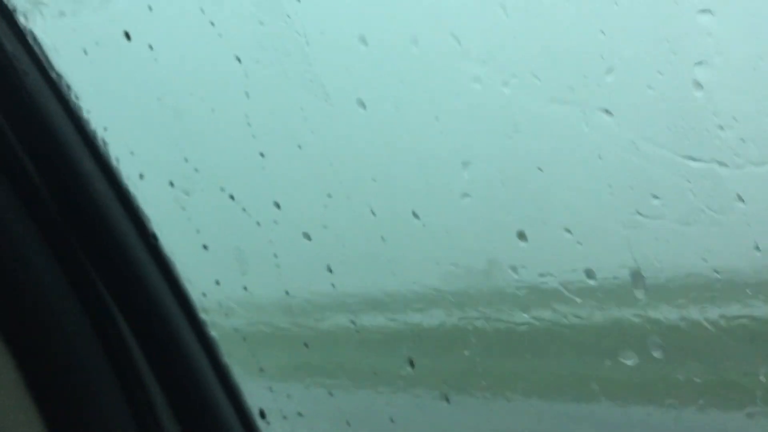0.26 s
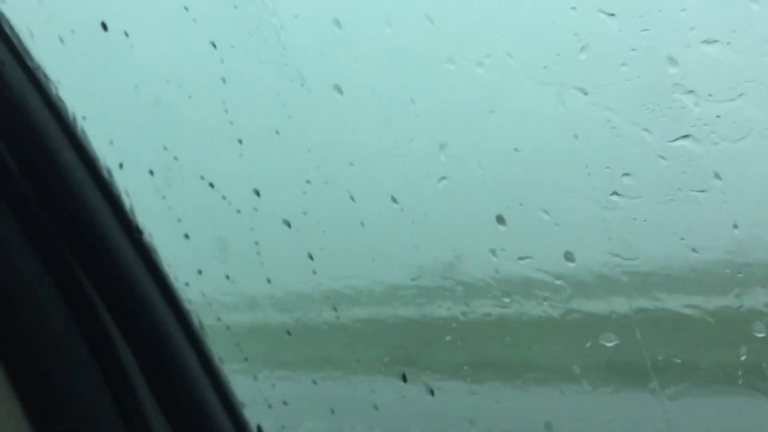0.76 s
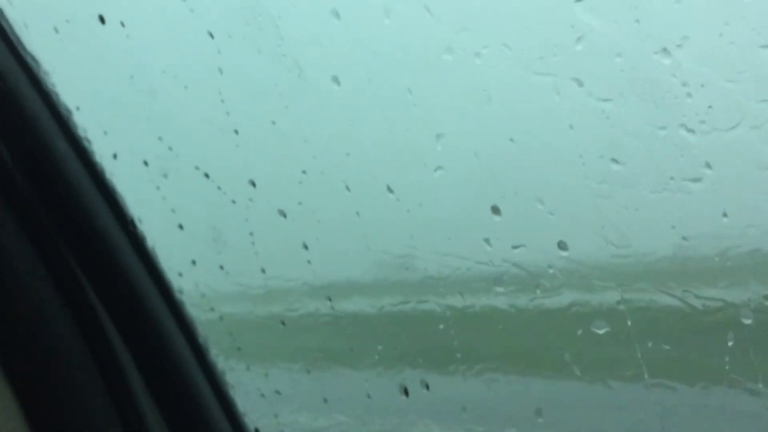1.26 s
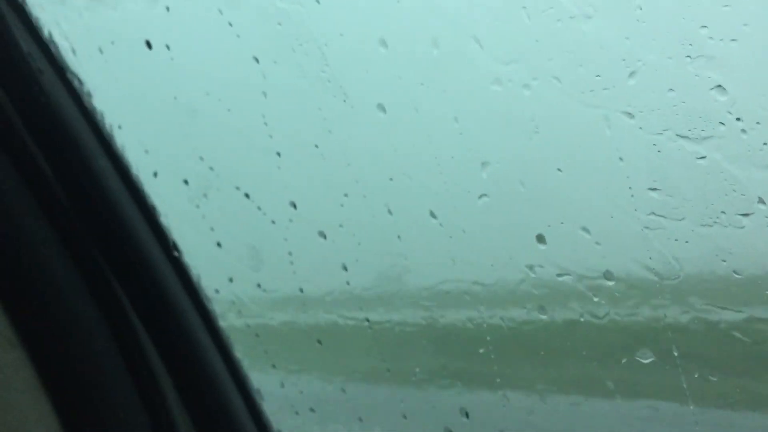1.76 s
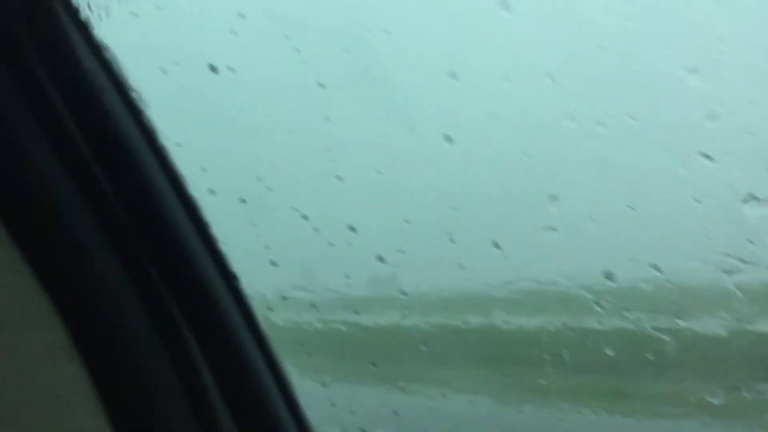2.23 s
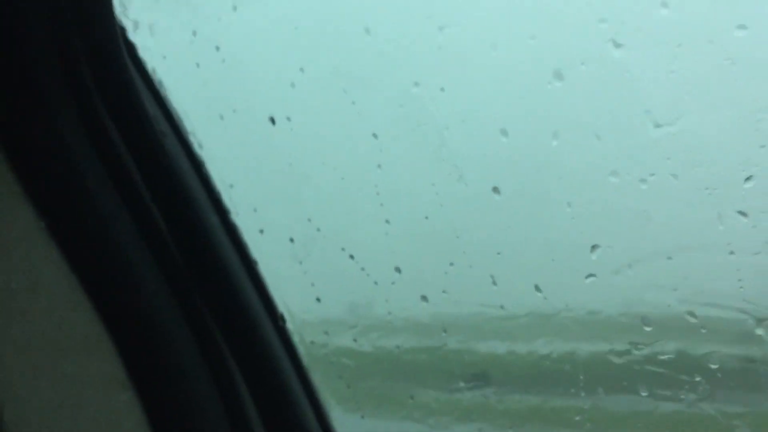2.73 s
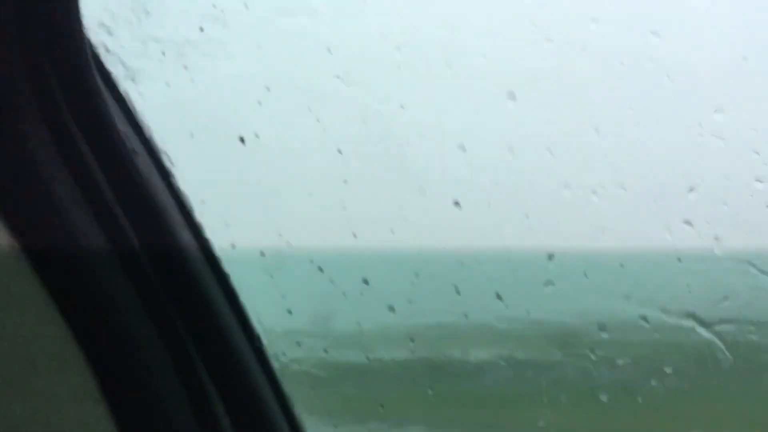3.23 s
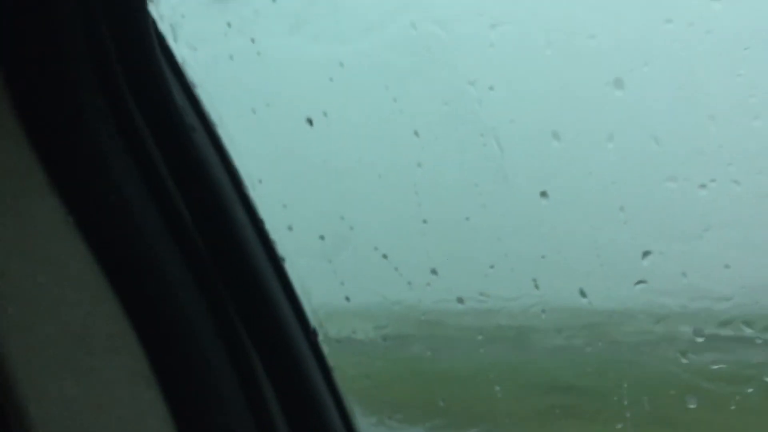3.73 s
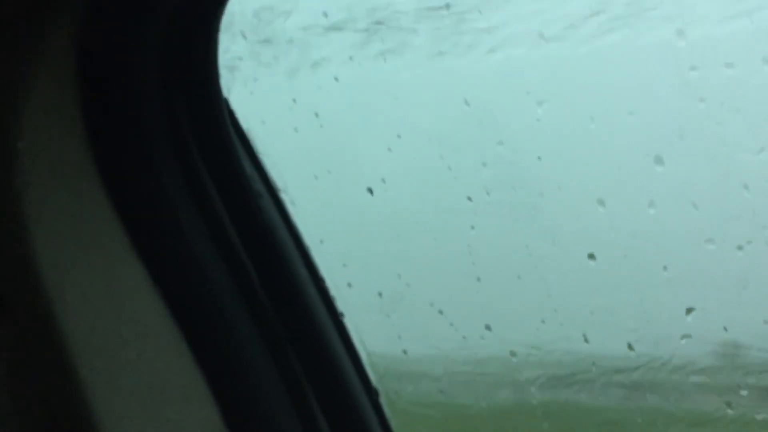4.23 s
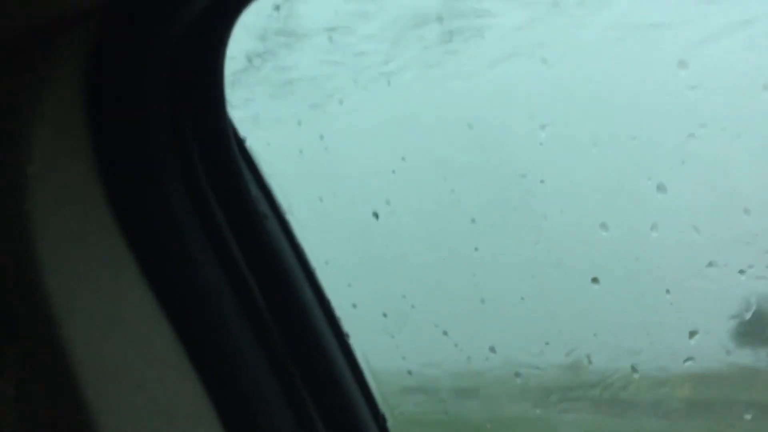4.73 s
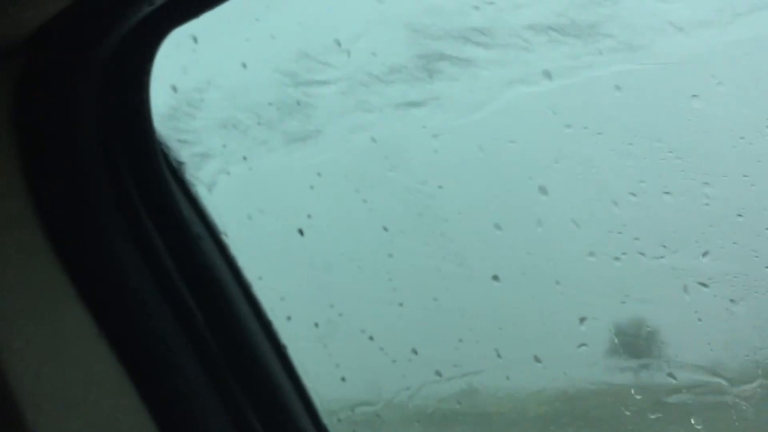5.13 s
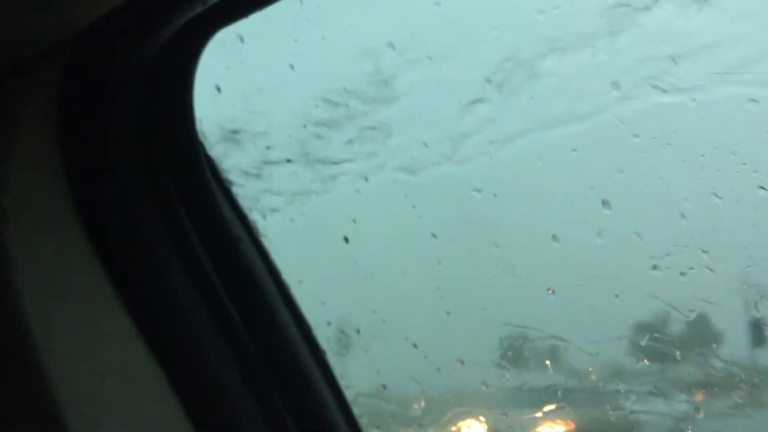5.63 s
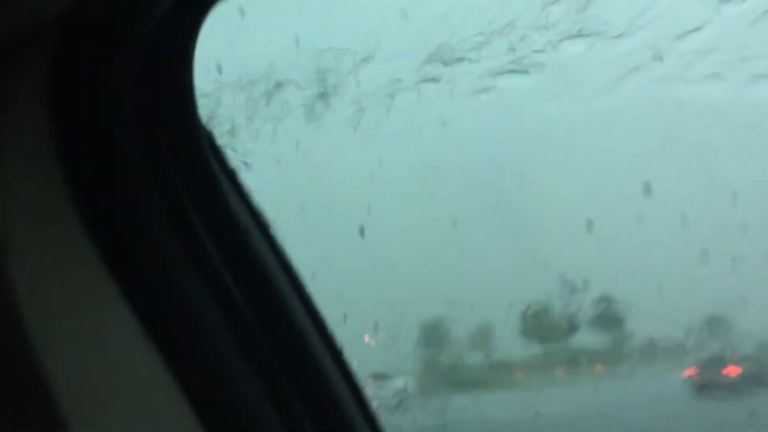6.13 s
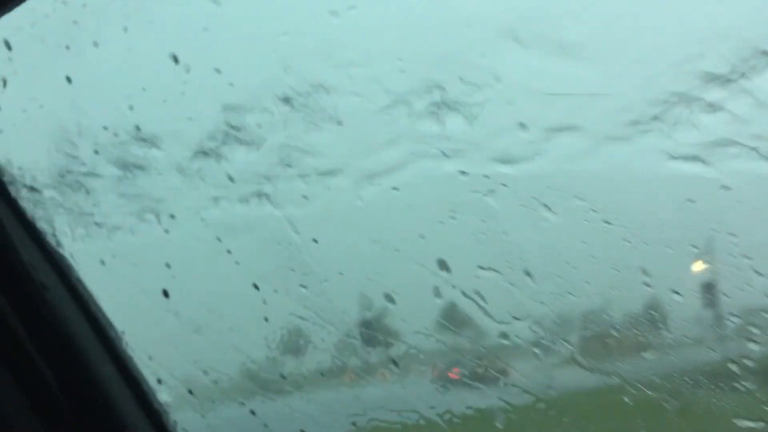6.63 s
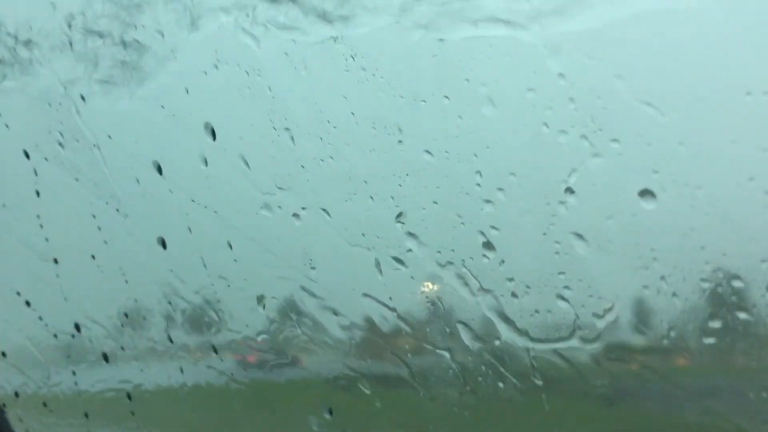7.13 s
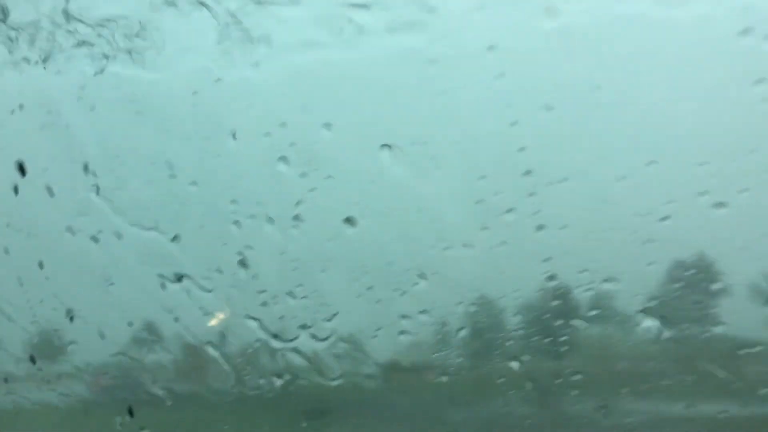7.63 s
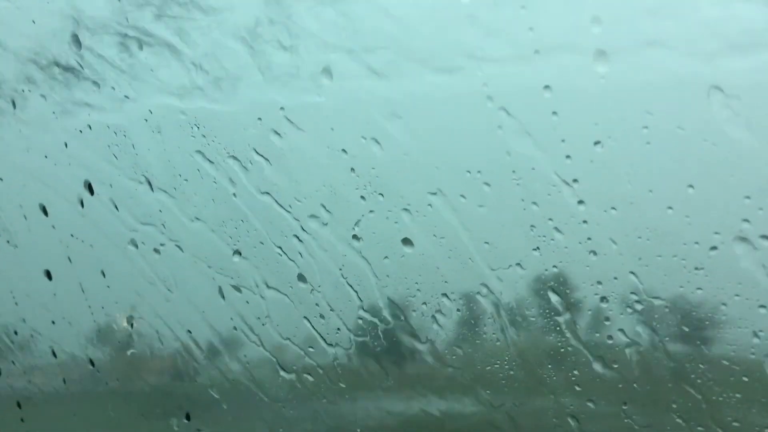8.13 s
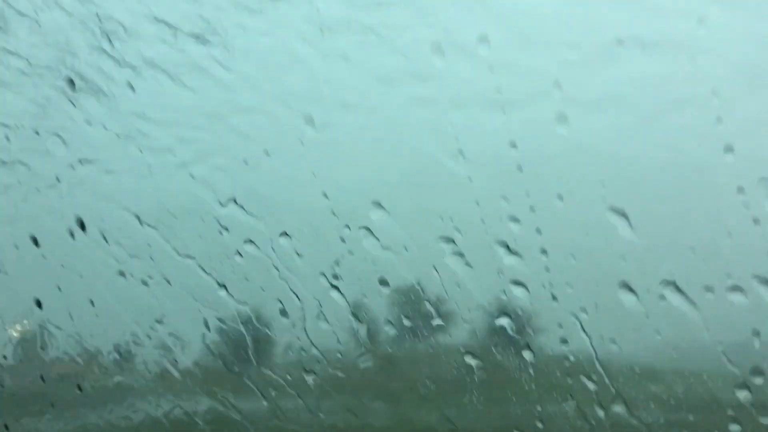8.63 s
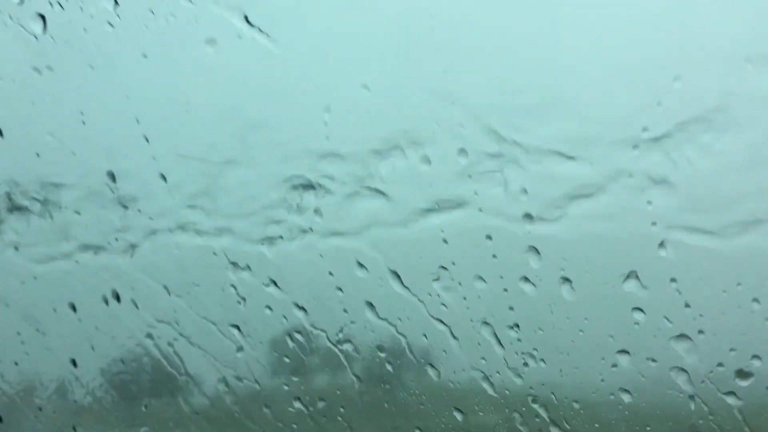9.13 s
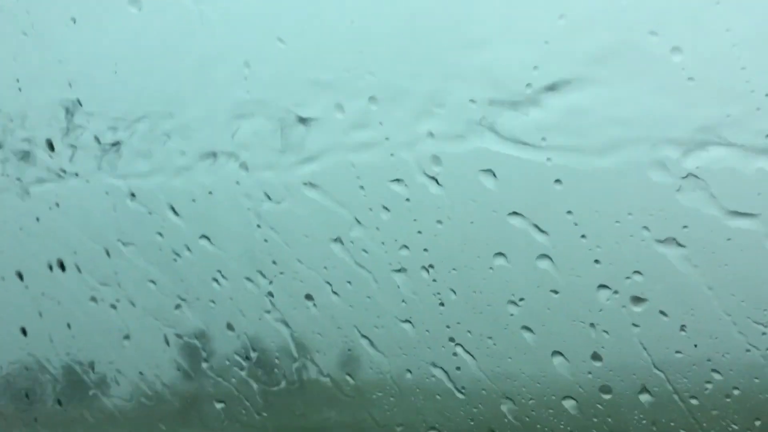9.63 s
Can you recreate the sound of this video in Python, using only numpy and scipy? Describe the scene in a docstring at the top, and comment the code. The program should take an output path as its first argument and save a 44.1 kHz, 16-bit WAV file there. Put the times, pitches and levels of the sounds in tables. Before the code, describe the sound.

Inside a car driving through a downpour, close to the side window. Dense rain patters on glass and drums on the roof in uneven gusts over a low tyre and wind rumble. Soon single fat drops smack the window nearby, then dull thuds and ragged water splats hit the body, and late on a few hollow knocks ring it. Single-channel, close cabin sound with muffled highs.

```python
"""Inside a car driving through a downpour, heard from a seat beside the window.
From the start, sheets of wind-driven rain patter on the glass and drum on the roof, as showers of random
damped drops, over filtered noise for the road and wind rumbling in the cabin's low resonances.
From 2.4 s single fat drops smack the window close by; from 3 s dull sinking thuds come from the body.
From 3.7 s gouts of water slap the body as ragged falling splats, and from 7 s a few hollow knocks ring it."""
import sys
import numpy as np
from scipy import signal
from scipy.fft import rfft, irfft, next_fast_len
from scipy.io import wavfile
from scipy.ndimage import map_coordinates

SR = 44100
rng = np.random.default_rng(int(sys.argv[2]) if len(sys.argv) > 2 else 0)


def generate_wav(sig):
    """Save sig (samples, or channels by samples) to the path in sys.argv[1] as 16-bit PCM at SR."""
    pcm = np.round(np.clip(np.atleast_2d(sig).T, -1, 1) * 32767).astype(np.int16)
    wavfile.write(sys.argv[1], SR, pcm)


N = 435266

# Resonances of the roof panel. Each row: pitch in Hz, width in Hz, gain in dB against the plain sound.
ROOF_RESONANCES = [(544, 72, 0), (1058, 62, -8.5), (1569, 140, 3)]


def rain():
    """Fine dense rain, fewer heavy drops and near ticks; a thicker sheet of rain is both denser and louder."""
    # Colour of rain on the window. Each row: frequency in Hz, relative gain in dB.
    glass_colour = [(500, -37.5), (1400, -9), (2050, -4), (2600, -3), (3400, -2.5), (3950, -7),
                    (4900, -16.5), (5600, -19), (6600, -25), (7700, -34), (9300, -39), (10500, -49),
                    (15000, -56)]
    # Resonances of the window. Each row: pitch in Hz, width in Hz, gain in dB against the plain sound.
    glass_resonances = [(2040, 110, -18.5), (3150, 100, -10.5), (3296, 170, -12)]
    # Colour of rain on the roof. Each row: frequency in Hz, relative gain in dB.
    roof_colour = [(200, -22), (350, 2.5), (470, -4), (660, -0.5), (760, -6), (950, -3), (1400, -3.5),
                   (1830, -16.5), (2600, -9.5), (5000, -32.5), (12000, -94)]
    glass_db, roof_db = -31.5, -32.5  # gains in average rain
    glass_follows, roof_follows = 0.036, 0.085  # dB of harder impact for each dB of thicker rain
    splash_hz, splash_follows = 6540, 0.12  # above this pitch, further dB for each dB of thicker rain

    level_db = rain_level()
    excess_db = level_db - np.mean(level_db)
    thickness = amp(excess_db)
    flurry_db = 0.95 * wobble(rate=24)  # quick chance changes in the rain

    # drops per second, in average rain, times the thickness
    fine = shower(3000 * thickness ** 2, spread_db=2, ring_t60=0.012)
    heavy = shower(240 * thickness, spread_db=1, ring_t60=0.0092)
    notes = pings(1050 * thickness, centre_hz=2207.3, ring_t60=0.055, spread_db=1.5)
    near = amp(-9) * ticks(170 * thickness ** 2, spread_db=2.7, ring_t60=0.018)

    on_glass = fine + amp(-7) * heavy + amp(-5.5) * notes + near
    glass = panel(on_glass, glass_colour, glass_resonances)
    splash_flicker_db = 1.0 * wobble(rate=32)
    glass = brightened(glass, splash_hz, splash_follows * excess_db + splash_flicker_db)

    # the same heavy drops also drum on the sheet metal, which rings longer
    patter = shower(1500 * thickness, spread_db=2.5, ring_t60=0.024)
    on_roof = patter + amp(-5.5) * heavy + amp(-5) * notes + near
    roof = panel(on_roof, roof_colour, ROOF_RESONANCES)

    glass_gain = amp(glass_db + glass_follows * excess_db + flurry_db)
    roof_gain = amp(roof_db + roof_follows * excess_db + flurry_db)
    return glass * glass_gain + roof * roof_gain


def rain_level():
    """The sheets add their power to the even rain; dB per sample, of which only the swings are used."""
    # The even rain between the sheets. Each row: time in seconds, level in dB.
    even_rain = [(0, -34), (2.08, -34), (2.13, -39.5), (2.18, -40.5), (2.5, -35.5), (3.2, -37),
                 (3.3, -39.5), (4.3, -39.5), (4.95, -39.5), (5.5, -34.5), (6.46, -35), (6.55, -43),
                 (6.62, -39), (6.93, -41), (7.12, -39.5), (7.35, -36.5), (8.15, -38.5), (8.62, -40),
                 (9, -38.5), (9.87, -38.5)]
    # Sheets of rain blown against the car. Each row: start in seconds, length in seconds, level in dB.
    blown_sheets = [(0.041, .11, -35), (0.198, .4, -37), (0.631, .27, -35.5), (1.031, .52, -37),
                    (1.66, .14, -37.5), (1.9, .17, -36.5), (2.201, .16, -38), (2.79, .34, -33.5),
                    (3.162, .09, -36.5), (3.349, .06, -37), (3.574, .055, -37.5), (3.691, .08, -32),
                    (3.799, .05, -35.5), (3.913, .11, -34.5), (4.087, .09, -37.5), (4.336, .1, -37),
                    (4.486, .05, -37), (4.605, .11, -32), (4.749, .14, -33.5), (4.971, .1, -30.5),
                    (5.08, .13, -34), (5.289, .43, -34), (5.869, .25, -34), (6.169, .12, -32),
                    (6.37, .09, -33), (6.586, .06, -36.5), (6.634, .08, -31.5), (6.729, .115, -36.5),
                    (6.98, .09, -39.5), (7.15, .17, -37), (7.379, .5, -36), (7.948, .08, -35),
                    (8.221, .07, -35), (8.404, .06, -33), (8.49, .05, -37), (8.65, .11, -35.5),
                    (8.835, .05, -34), (8.909, .27, -33.5), (9.22, .34, -39.5), (9.661, .15, -35)]
    even_db, = curves(even_rain)
    power = amp(even_db) ** 2
    for start, length, db in blown_sheets:
        sheet = amp(db) * spell(start, length, attack_s=0.045, release_s=0.03)
        power = power + sheet ** 2
    return 10 * np.log10(power)


def shower(per_second, spread_db, ring_t60, cabin_t60=0.3, cabin_db=-14):
    """Random drops of unequal size, each a quickly damped noisy ring with the cabin's short answer; rms 1."""
    t = np.arange(SR // 10) / SR
    lands = rng.random(N) < per_second / SR
    sizes = amp(spread_db * np.minimum(rng.standard_normal(N), 2))
    fade = decay(t, ring_t60) + amp(cabin_db) * decay(t, cabin_t60)
    # unrelated rings add in power
    power = np.abs(signal.oaconvolve(lands * sizes ** 2, fade ** 2)[:N])
    return unit(np.sqrt(power) * rng.standard_normal(N))


def pings(per_second, centre_hz, ring_t60, spread_db):
    """Drops that each ring one short note of the panel where they land; rms 1."""
    start = np.flatnonzero(rng.random(N) < per_second / SR)[:, None]
    octaves, weight = rng.standard_normal((len(start), 2)).T[..., None]
    k = np.arange(SR // 50)
    hz = np.minimum(centre_hz * 2 ** octaves, SR / 4)
    sizes = amp(spread_db * np.minimum(weight, 2))
    notes = sizes * decay(k / SR, ring_t60) * np.sin(2 * np.pi * hz * k / SR)
    return unit(np.bincount((start + k).ravel(), notes.ravel(), N)[:N])


def ticks(per_second, spread_db, ring_t60, middle_hz=1999, range_ratio=2.1, click_t60=0.011):
    """Near drops heard one by one: an instant click and a short note, each of its own pitch; rms 1."""
    start = np.flatnonzero(rng.random(N) < per_second / SR)[:, None]
    pitch, weight = rng.uniform(-0.996, 1, (len(start), 2)).T[..., None]
    k = np.arange(SR // 40)
    hz = middle_hz * range_ratio ** pitch
    note = np.sin(2 * np.pi * hz * k / SR) * decay(k / SR, ring_t60)
    click = rng.standard_normal(note.shape) * decay(k / SR, click_t60)
    sounds = amp(spread_db * weight) * (note + click)
    return unit(np.bincount((start + k).ravel(), sounds.ravel(), N)[:N])


def drops(smack_t60=0.022, ring_t60=0.03, spray_t60=0.05, attack_s=0.001, cabin_t60=0.1, cabin_db=-14):
    """Each fat drop smacks the glass, rings one of its notes and bursts into bright spray; the cabin answers."""
    # Fat drops on the window. Each row: start in seconds, level in dB (9 dB is taken off all),
    # ring in Hz, gain of the spray in dB and gain of the note in dB, both beside the smack.
    fat_drops = [(2.3605, -9, 3950, -20, 2), (2.3635, -10.5, 950, -26, 1), (2.5622, -11.5, 2200, -27, 0.5),
                 (3.3135, -22, 3206, -24, 0), (3.592, -17, 3015, -23, 1), (3.651, -20, 3295, -20, -1),
                 (4.019, -22, 3314, -10, -3), (4.2085, -11, 2840, -22, -4), (4.322, -28, 3294, -12, -3),
                 (4.366, -23, 3406, -10, -3), (4.501, -29, 3177, -16, -3), (4.588, -17, 3187, -26, -1),
                 (4.8095, -12, 3307, -22, -6), (4.8245, -14, 3320, -13, -3), (5.0175, -12, 3687, -26, -1),
                 (5.1802, -15, 3454, -19, 0), (5.1965, -11, 3150, -21, -1), (5.46, -22, 3097, -22, -3),
                 (5.5235, -5, 3380, -12.5, -3), (5.5465, -8, 3105, -21, -7), (5.6335, -9, 3510, -9.5, -2),
                 (5.6387, -9, 3610, -15, -1), (5.7034, -13, 3330, -17, -3), (5.873, -12, 3130, -16, -1),
                 (5.965, -12, 2246, -20, -3), (6.5808, -23, 2547, -14, 2), (6.606, -20, 3280, -24, -1),
                 (7.072, -24, 3494, -4, -3), (7.559, -12, 3150, -22, -7), (8.5112, -20, 3220, -27, 2),
                 (8.745, -17, 3130, -16, -6), (8.9186, -15, 2030, -18, -3), (9.4, -17.5, 3344, -25, 0)]
    # Colour of the smack. Each row: frequency in Hz, relative gain in dB.
    smack_colour = [(150, -1), (500, 4), (1050, -2), (1600, 0.5), (2600, 3.5), (3700, 3.5), (4800, -9.5),
                    (6500, -23.5), (8000, -35), (10500, -44), (15000, -59)]
    # Colour of the spray. Each row: frequency in Hz, relative gain in dB.
    spray_colour = [(1500, -31), (4000, 11), (5800, 8.5), (7500, -3.5), (10000, -13.5), (15000, -27)]
    out, t = np.zeros(N), np.arange(SR // 10) / SR
    smack_fade = decay(t, smack_t60) + amp(cabin_db) * decay(t, cabin_t60)
    onset = 1 - np.exp(-t / attack_s)
    for s, db, hz, spray_db, note_db in fat_drops:
        smack = unit(coloured(rng.standard_normal(len(t)), smack_colour)) * smack_fade
        note = amp(note_db) * np.sin(2 * np.pi * hz * t) * decay(t, ring_t60)
        spray_noise = unit(coloured(rng.standard_normal(len(t)), spray_colour))
        spray = amp(spray_db) * spray_noise * decay(t, spray_t60)
        add(out, s, amp(db - 9.0) * (smack + note + spray) * onset)
    # the drops set the roof ringing too
    return out + amp(-2) * ringing(out, ROOF_RESONANCES)


def slaps(low_hz=174, churn_per_cycle=2.2):
    """A gout of water hits hard, then spreads: its broad, ragged splat darkens into the panel's low note."""
    # Gouts of water on the body. Each row: start in seconds, level in dB, starting pitch in Hz,
    # length in seconds, time constant of the pitch's fall in seconds.
    gouts = [(3.719, -35, 1502, 0.05, 0.034), (4.815, -31, 607, 0.03, 0.038),
             (5.709, -29.5, 557, 0.036, 0.044), (8.031, -27, 1499, 0.049, .012),
             (8.745, -24.5, 1412, 0.048, .016), (9.452, -31, 500.2, 0.073, 0.063)]
    # The gouts are dull, with little above 2.5 kHz. Each row: frequency in Hz, gain in dB.
    gout_treble = [(2500, 0), (5000, -10), (12000, -40)]
    out, t = np.zeros(N), np.arange(SR // 5) / SR
    for s, db, hz, length, fall_s in gouts:
        pitch = low_hz + (hz - low_hz) * np.exp(-t / fall_s)
        cycles = np.cumsum(pitch) / SR
        # two random curves that churn with the pitch make the tone ragged
        knots = rng.standard_normal(size=(2, 256))
        a, b = (map_coordinates(row, [cycles * churn_per_cycle], mode="mirror") for row in knots)
        splat = a * np.sin(2 * np.pi * cycles) + b * np.cos(2 * np.pi * cycles)
        add(out, s, amp(db) * swell(t, length) * splat)
    # the gouts set the roof ringing
    return coloured(out + amp(-10) * ringing(out, ROOF_RESONANCES), gout_treble)


def thuds(sag=0.27):
    """A jolt flexes the body for a few cycles, sinking in pitch as it relaxes."""
    # Dull thuds of the body. Each row: start in seconds, peak in dB, middle pitch in Hz, length in seconds.
    jolts = [(3.008, -17.5, 151.4, 0.04), (3.838, -28, 109, 0.056), (4.041, -13, 109.5, 0.042),
             (4.174, -11.5, 125, 0.034), (4.747, -20, 84.9, 0.057), (4.825, -20, 84, 0.053),
             (4.95, -21, 87.9, 0.067), (5.023, -25, 102.3, 0.069), (5.913, -15.5, 99.2, 0.032),
             (6.295, -15.5, 78.8, 0.075), (6.415, -17.5, 142.7, 0.063), (7.688, -16.5, 160.4, 0.033),
             (7.78, -18.5, 158.4, 0.032), (8.043, -14.5, 166, 0.031), (8.757, -14.5, 181, 0.048)]
    out, t = np.zeros(N), np.arange(SR // 4) / SR
    for s, db, hz, length in jolts:
        # from a share sag above the middle pitch to as much below
        pitch = hz * (1 + sag * (2 * np.exp(-t / (length / 2)) - 1))
        add(out, s, amp(db) * swell(t, length) * np.sin(2 * np.pi * np.cumsum(pitch) / SR))
    return out


def knocks(ring_db=-13, noise_db=-9):
    """A knock rings the body's modes, most strongly near its own pitch; bending waves bring the low ones later."""
    # Hollow knocks on the body. Each row: start in seconds, level in dB, pitch in Hz, length in seconds,
    # lag in seconds of a mode two octaves below the highest, dB per octave away from the pitch.
    body_knocks = [(7.061, -23, 579.4, 0.0093, 0, -13), (7.0687, -19, 1500, 0.011, 0.0011, -9),
                   (8.027, -25, 1300, 0.032, .007, -6.5), (8.741, -19, 1250, 0.026, .007, -7.5)]
    # What a knock rings. Each row: pitch in Hz, gain in dB, t60 in seconds.
    body_rings = [(301.9, 5, .12), (570.2, -6, .15), (666.7, -2, 0.18), (860, -5.5, .07), (1096, -4, 0.2),
                  (1230, -6, .11), (1598.4, -3, .08), (2030, -12, .04), (2310, -13, .08)]
    # The hiss of the contact. Each row: frequency in Hz, relative gain in dB.
    hiss_colour = [(300, -14), (1000, 3), (2300, 1), (3000, -5), (4500, -19), (10000, -55), (15000, -72)]
    out, t = np.zeros(N), np.arange(SR // 5) / SR
    highest_hz = max(mode[0] for mode in body_rings)
    for s, db, centre_hz, length, lag_s, tilt_db in body_knocks:
        push = swell(t, length)
        hiss = unit(coloured(rng.standard_normal(len(t)), hiss_colour))
        add(out, s, amp(db + noise_db) * push * hiss)
        for hz, mode_db, t60 in body_rings:
            late = lag_s * (np.sqrt(highest_hz / hz) - 1)
            shape = push + amp(ring_db) * decay(t, t60) * (1 - np.exp(-t / length))
            note = np.sin(2 * np.pi * (hz * t + rng.random()))
            octaves_away = abs(np.log2(hz / centre_hz))
            add(out, s + late, amp(db + mode_db + tilt_db * octaves_away) * shape * note)
    return out


def rumble():
    """Tyres and wind shake the body, harder in spells; the cabin booms in its low resonances."""
    # Steady noise of the tyres. Each row: time in seconds, level in dB.
    tyre_noise = [(0, -32), (3.4, -32), (5.5, -29.5), (7.5, -31), (8.6, -31.5), (9.87, -30.5)]
    # Spells of harder shaking by road and wind. Each row: start in seconds, length in seconds,
    # level of the rumble in dB, level of the boom in dB.
    shaking = [(2.906, 0.17, -46, -29.5), (3.797, 0.54, -30.5, -33.5), (4.615, 0.21, -28, -37),
               (4.958, 0.21, -31.5, -32.5), (5.453, 0.29, -44, -28.5), (5.824, 0.17, -28, -38),
               (6.236, 0.191, -25, -34), (9.123, 0.2, -29, -31.5), (9.4, 0.53, -44, -32.5)]
    # Colour of the road rumble. Each row: frequency in Hz, relative gain in dB.
    road_colour = [(15, -51.5), (26, -26), (35, -22), (44, -6), (64, -6.5), (76, -3.5), (85, 1.5), (98, -7),
                   (115, -16), (200, -27.5), (1500, -100)]
    # Colour of the cabin's boom. Each row: frequency in Hz, relative gain in dB.
    boom_colour = [(70, -35), (110, -5), (145, 2), (172, 0.5), (200, -6), (240, -3.5), (265, -8),
                   (295, -6.5), (330, -13.5), (450, -18.5), (900, -35.5), (4000, -100)]
    tyres_db, = curves(tyre_noise)
    road_power = amp(tyres_db) ** 2
    steady_boom_db = -29 + 0.5 * wobble(rate=4.02)  # drifts slowly
    boom_power = amp(steady_boom_db) ** 2
    for s, length, road_db, boom_db in shaking:
        shake = spell(s, length, attack_s=0.016, release_s=0.037)
        road_power = road_power + (amp(road_db) * shake) ** 2
        boom_power = boom_power + (amp(boom_db) * shake) ** 2
    road = unit(coloured(rng.standard_normal(N), road_colour))
    boom = unit(coloured(rng.standard_normal(N), boom_colour))
    return road * np.sqrt(road_power) + boom * np.sqrt(boom_power)


def panel(x, spectrum, modes):
    """x through a panel: its broad colour with resonances standing out; rms 1."""
    return unit(coloured(x + ringing(x, modes), spectrum))


def ringing(x, modes):
    """What the resonances of a panel make of x."""
    out = np.zeros(len(x))
    for hz, width, db in modes:
        b, a = signal.iirpeak(hz, hz / width, fs=SR)
        out += amp(db) * signal.lfilter(b, a, x)
    return out


def brightened(x, from_hz, db):
    """x with everything above from_hz raised by db."""
    highpass = signal.butter(3, min(from_hz, SR / 3), "high", fs=SR, output="sos")
    treble = signal.sosfiltfilt(highpass, x)
    return x + (amp(db) - 1) * treble


def coloured(x, points):
    """x through a causal minimum-phase filter with the gains of the (Hz, dB) points."""
    m = 2 * next_fast_len(len(x) // 2 + SR // 10)
    hz, db = np.transpose(points)
    log_hz = np.log(np.fft.rfftfreq(m, 1 / SR) + 1)
    log_gain = np.log(amp(np.interp(log_hz, np.log(hz), db)))
    # folding the cepstrum onto positive times makes the filter causal
    cepstrum = irfft(log_gain, m)[:m // 2]
    cepstrum[1:] *= 2
    response = np.exp(rfft(cepstrum, m))
    return irfft(rfft(x, m) * response, m)[:len(x)]


def spell(start, length, attack_s, release_s):
    """A gain that rises, holds until the length is over and dies away."""
    t = np.arange(N) / SR - start
    return np.clip(t / attack_s, 0, 1) * np.exp(-np.maximum(t - length, 0) / release_s)


def swell(t, length):
    """A soft push that peaks a little past a third of its length and dies away."""
    u = np.e * t / length
    return u ** 2 * np.exp(2 * (1 - u))


def decay(t, t60):
    """A gain that falls by 60 dB in t60 seconds."""
    return 1000. ** (-t / t60)


def wobble(rate):
    """A smooth random curve, rate knots a second."""
    knots = rng.standard_normal(int(N * rate / SR) + 4)
    return map_coordinates(knots, [np.arange(N) * rate / SR])


def curves(rows):
    """One value per sample for each column after the time."""
    s, *cols = np.transpose(rows)
    return [np.interp(np.arange(N) / SR, s, c) for c in cols]


def add(track, s, sound):
    """Mix a sound into the track at s seconds."""
    part = track[round(s * SR):][:len(sound)]
    part += sound[:len(part)]


def amp(db):
    """Decibels to gain."""
    return 10 ** (np.asarray(db) / 20)


def unit(x):
    """x at rms 1."""
    return x / np.sqrt(np.mean(x ** 2) + 1e-20)


def scene():
    """Everything as heard from a seat beside the window, on one channel."""
    return (rain() + drops() + slaps() + thuds() + knocks() + rumble())[None]


def record(dry):
    """The microphone's recorder cuts steeply above its band limit of 15200 Hz."""
    lowpass = signal.ellip(10, 0.1, 80, 15200, fs=SR, output="sos")
    return signal.sosfilt(lowpass, dry)


dry = scene()
out = record(dry)
generate_wav(out)
```